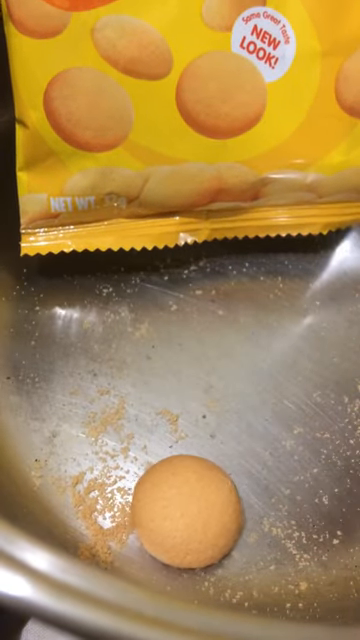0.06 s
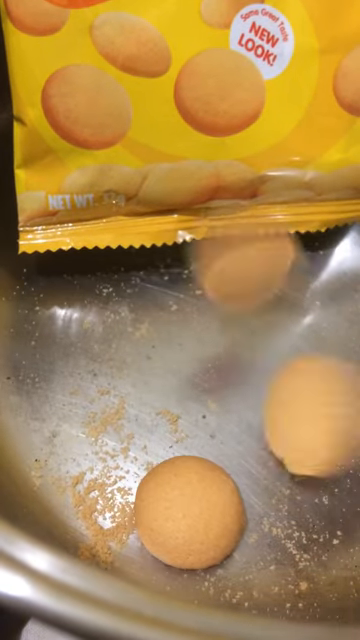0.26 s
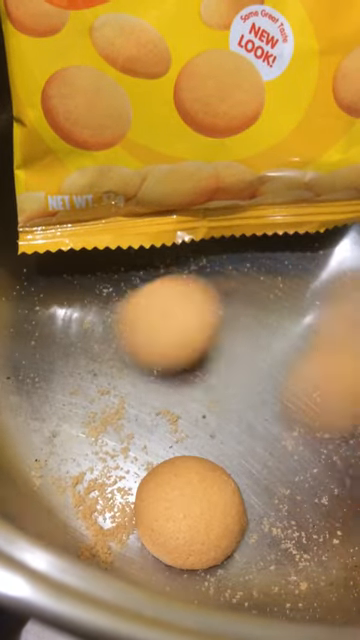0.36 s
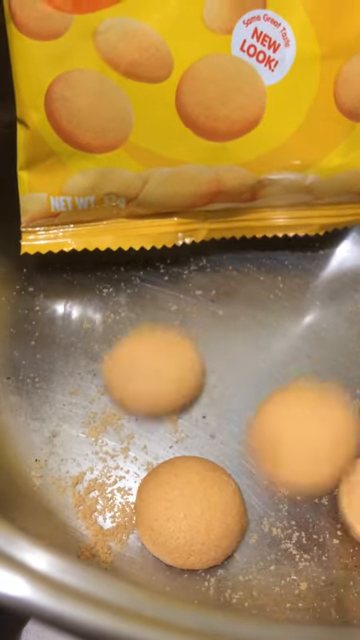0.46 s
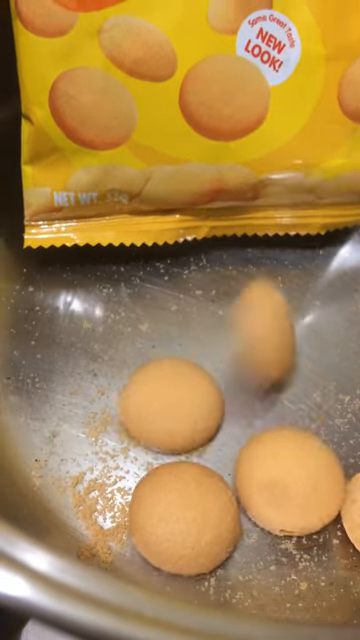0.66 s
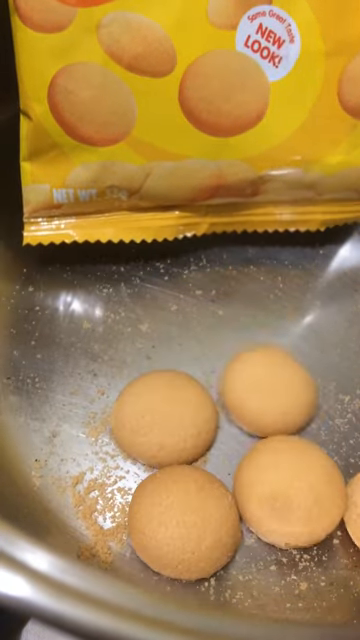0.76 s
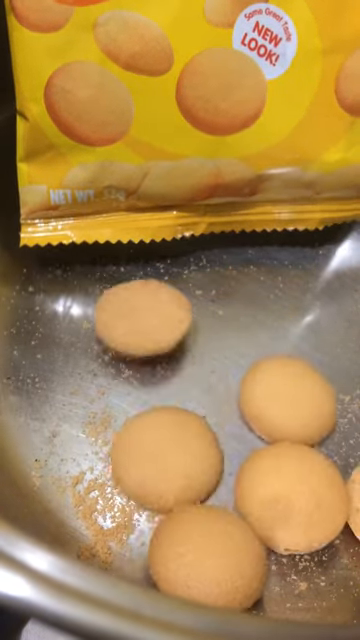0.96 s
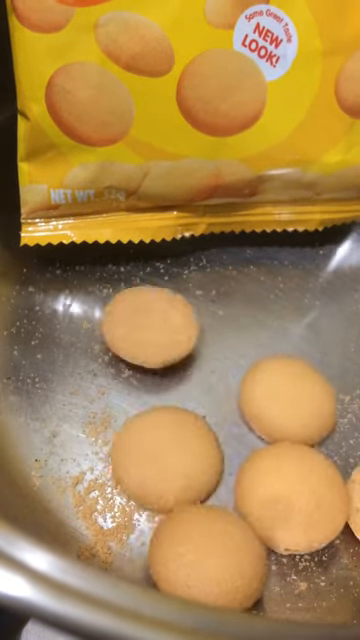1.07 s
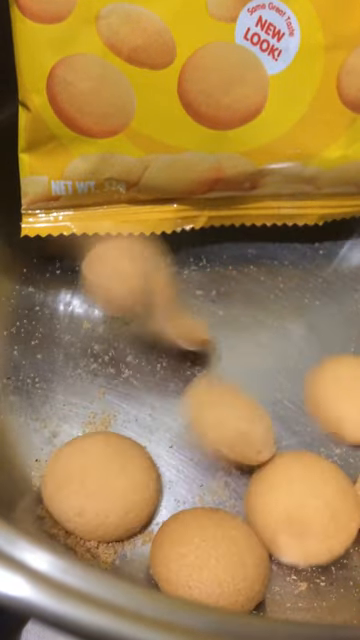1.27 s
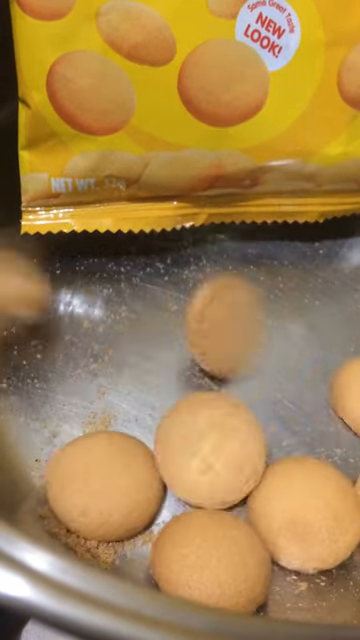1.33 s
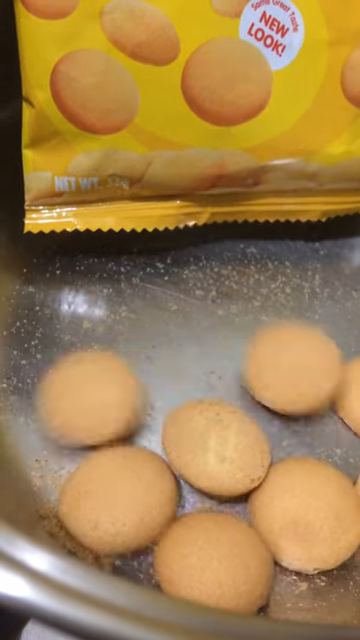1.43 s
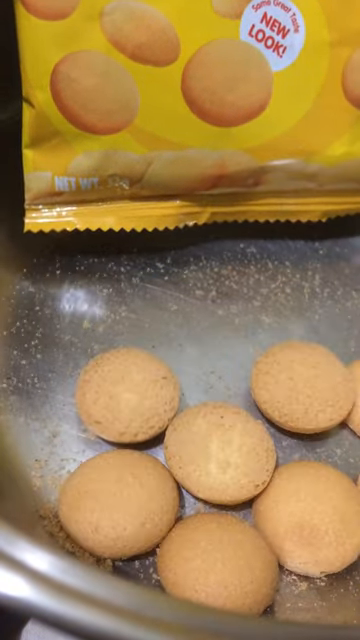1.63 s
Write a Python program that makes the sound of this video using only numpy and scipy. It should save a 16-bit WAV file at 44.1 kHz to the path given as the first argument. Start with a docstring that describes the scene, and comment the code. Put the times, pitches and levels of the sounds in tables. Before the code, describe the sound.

Small hard cookies drop into a steel pan in three quick clusters, each landing with a dry crack and a short metallic ring, then bouncing and knocking together. Heard close in a kitchen, over faint hiss.

```python
"""Small hard cookies drop from a bag into a steel pan, heard from close by in a kitchen.
Each lands with a dry crack, sets the pan's floor and wall ringing, then bounces and knocks against
the others. Cracks are sprays of tiny fractures in the crust; the steel rings in decaying modes.
The bag rustles faintly, crumbs tick, and hiss, a low rumble and mains hum lie underneath."""
import sys
import numpy as np
from scipy import signal
from scipy.fft import rfft, irfft
from scipy.io import wavfile

SR = 44100
rng = np.random.default_rng(int(sys.argv[2]) if len(sys.argv) > 2 else 0)


def master_out(mix):
    """Clip the mix to full scale and print it as 16-bit PCM to the path in sys.argv[1]."""
    frames = np.transpose(np.atleast_2d(mix))
    ceiling = np.clip(frames, -1, 1)
    pcm = np.round(ceiling * 32767).astype(np.int16)
    wavfile.write(sys.argv[1], SR, pcm)


N = 74970
TIME_S = np.arange(N) / SR
AGE_S = TIME_S[:int(.4 * SR)]   # time since a blow


def from_db(db):
    """Decibels to gain."""
    return 10 ** (np.asarray(db) / 20)


def rms_one(x):
    """Scale to unit power."""
    return x / np.sqrt(np.mean(x ** 2) + 1e-20)


def band(x, low_hz, high_hz):
    """Causal band-pass."""
    return signal.sosfilt(signal.butter(2, [low_hz, high_hz], "band", fs=SR, output="sos"), x)


def fade(t60_s):
    """Exponential decay."""
    return np.exp(-np.log(1000) * AGE_S / t60_s)


def add(out, start_s, sound):
    """Mix a sound in at a time."""
    i = int(start_s * SR)
    out[i:i + len(sound)] += sound[:N - i]


def mode(hz, db, t60_s):
    """One decaying sine."""
    return np.sqrt(2) * from_db(db) * fade(t60_s) * np.sin(2 * np.pi * hz * AGE_S)


def struck_modes(table):
    """Sum of modes, each with a random sign, detuning, strength and damping."""
    out = 0
    for hz, db, t60_s in table:
        sign = rng.choice([-1, 1])
        detuned_hz = hz * (1 + .002 * rng.normal())
        out += sign * mode(detuned_hz, db + 3 * rng.normal(), t60_s * np.exp(.2 * rng.normal()))
    return out


def crunch(low_hz, high_hz, t60_s):
    """Crust crushes in a dying spray of tiny fractures: a first snap, then grains on fine dust."""
    fractures_per_s, dust_db, snap_db, snap_t60_s = 3000, -12.5, -4, .013
    grains = (rng.random(len(AGE_S)) < fractures_per_s / SR) * rng.standard_normal(len(AGE_S))
    spray = rms_one(grains) + from_db(dust_db) * rng.standard_normal(len(AGE_S))
    envelope = fade(t60_s) + from_db(snap_db) * fade(snap_t60_s) + 1e-12
    burst = band(spray * envelope, low_hz, high_hz)
    return rms_one(burst) * np.sqrt(np.mean(fade(t60_s) ** 2))


def room_hiss():
    """Coloured noise, rolled off below 155 Hz, drifting slightly in level."""
    # Each row: frequency in Hz, relative density in dB before the roll-off.
    spectrum = [(120, -42), (200, -27.5), (289, -12.5), (806, -19), (916, -19), (1210, -13.5),
                (3490, -33.5), (4120, -33.5), (9060, -43.5), (16000, -42)]
    # Each row: time in seconds, level in dB.
    levels = [(0, -47.5), (.2, -47), (.6, -49), (1.15, -50), (1.69, -46)]
    knots_hz, knots_db = np.transpose(spectrum)
    hz = np.maximum(np.fft.rfftfreq(N, 1 / SR), 1)
    colour = from_db(np.interp(np.log(hz), np.log(knots_hz), knots_db)) * hz / np.hypot(hz, 155)
    hiss = rms_one(irfft(rfft(rng.standard_normal(N)) * colour, N))
    return hiss * from_db(np.interp(TIME_S, *np.transpose(levels)))


def rumble():
    """Low noise that comes and goes."""
    # Each row: time in seconds, level in dB.
    levels = [(0, -44.5), (.1, -45), (.21, -41.5), (.26, -57.5), (.6, -52), (.7, -48), (.8, -55),
              (.95, -56), (1.02, -48.5), (1.1, -57), (1.23, -41.5), (1.32, -44.5), (1.45, -56.5),
              (1.69, -43)]
    noise = rms_one(band(rng.standard_normal(N), 54, 182))
    return noise * from_db(np.interp(TIME_S, *np.transpose(levels)))


def mains_hum():
    """Three steady harmonics of the mains."""
    # Each row: frequency in Hz, level in dB.
    harmonics = [(59, -60), (118, -61.5), (177, -58.5)]
    return sum(np.sqrt(2) * from_db(db) * np.sin(2 * np.pi * (hz * TIME_S + rng.random()))
               for hz, db in harmonics)


def kitchen_reverb(x):
    """Short diffuse tail in two bands."""
    level_db, onset_s = -21, .011
    white = rng.standard_normal(len(AGE_S))
    tail = band(white, 140, 4700) * fade(.29) + band(white[::-1], 7200, 9100) * fade(.3)
    tail *= 1 - np.exp(-(AGE_S / onset_s) ** 2)
    return from_db(level_db) * signal.fftconvolve(x, tail / np.linalg.norm(tail))[:N]


def bag_rustle():
    """The foil bag crinkles faintly while the first cookies slide out."""
    start_s, end_s, ramp_s, creases_per_s = .02, .68, .03, 520
    creases = (rng.random(N) < creases_per_s / SR) * rng.laplace(size=N)
    sliding = np.clip(np.minimum(TIME_S - start_s, end_s - TIME_S) / ramp_s, 0, 1)
    return from_db(-62.5) * sliding * rms_one(band(creases + 1e-18, 1200, 12500))


def crumb_ticks():
    """Crumbs and cookies touch drily, leaving the pan still."""
    # Each row: start in seconds, relative level in dB, band centre in Hz.
    ticks = [(0.167, -69, 4660), (.193, -49, 3520), (0.196, -53, 12000), (0.222, -43, 8000),
             (0.232, -39, 7000), (0.357, -23.5, 8900), (0.506, -43, 8000), (0.566, -43.5, 11000),
             (0.678, -45.5, 9000), (.79, -38.5, 9000), (.825, -46.5, 8900), (1.071, -42.5, 6500),
             (1.314, -40, 11000), (1.503, -41, 5000), (1.562, -44, 8000)]
    edge_ratio = 2 ** .7
    out = np.zeros(N)
    for start_s, db, hz in ticks:
        add(out, start_s, from_db(db + 1) * crunch(hz / edge_ratio, hz * edge_ratio, t60_s=.023))
    return out


def pan_shoves():
    """Heavy contacts shove the whole pan with a short low bump."""
    # Each row: start in seconds, level in dB.
    shoves = [(0.284, -36), (.357, -36), (0.44, -40), (.688, -32.5), (.8835, -33.5), (1.24, -28.5),
              (1.289, -27), (1.3852, -37)]
    out = np.zeros(N)
    for start_s, db in shoves:
        add(out, start_s, from_db(db) * crunch(240, 605, t60_s=.019))
    return out


def mode_gaps(x):
    """Notch the gaps between the pan's clusters of modes."""
    # Each row: centre in Hz, width in Hz.
    gaps = [(5130, 265), (6480, 100)]
    for hz, width_hz in gaps:
        x = signal.lfilter(*signal.iirnotch(hz, hz / width_hz, fs=SR), x)
    return x


def pan_floor(levels_db, t60_s, first_hz, rise_s):
    """Four drum-like modes, damped, detuned and roughened by loose cookies, with a weak longer ring."""
    # Modes 2-4. Each row: frequency in Hz, t60 as a share of the first mode's.
    overtones = [(1537, .62), (2618, .42), (2976, .85)]
    # Each row: frequency in Hz, level in dB relative to its mode, t60 as a multiple of t60_s.
    afterrings = [(796, -25.5, 1.6), (1540, -33, 1.7), (2607, -14, 2.1), (3120, -26, 1.3)]
    sharp_hz, settle_s = 1.4, .0027   # the floor starts sharp and settles
    lead_s = sharp_hz / first_hz * settle_s * (1 - np.exp(-AGE_S / settle_s))
    tuned = [(first_hz, 1)] + [(hz * (1 + .006 * rng.normal()), share) for hz, share in overtones]
    out = 0
    for k, (db, (hz, share)) in enumerate(zip(levels_db, tuned)):
        after_hz, after_db, after_ratio = afterrings[k]
        ring = np.sqrt(2) * from_db(db) * fade(t60_s * share) * np.sin(2 * np.pi * hz * (AGE_S + lead_s))
        ring += mode(after_hz, db + after_db, after_ratio * t60_s)
        chatter = 1 + .063 * rms_one(band(rng.standard_normal(len(AGE_S)), 40, 350))
        out += (-1) ** k * chatter * ring
    radiation = signal.butter(4, 630, "high", fs=SR, output="sos")   # the pan radiates little bass
    return signal.sosfilt(radiation, out * (1 - np.exp(-AGE_S / rise_s)))


def crust_contact(floor_db, wall_db, knock_db, crack_db, fizz_db):
    """A dull thud, then three bands of crunch, each with a shimmer of dense high pan modes."""
    # Knock, crack, fizz. Each row: low and high edge in Hz, burst gain in dB, burst t60 in seconds,
    # shimmer gain in dB, shimmer t60 in seconds.
    bands = [(2170, 5300, 6, 0.017, -15, 0.14), (5450, 8720, 1.5, 0.034, -11, 0.09),
             (9140, 14000, -0.5, 0.042, -8.5, 0.11)]
    out = from_db((floor_db + knock_db) / 2 - 2.5) * crunch(830, 1570, t60_s=.023)
    for db, row in zip((knock_db, crack_db, fizz_db), bands):
        low_hz, high_hz, burst_db, burst_t60_s, shimmer_db, shimmer_t60_s = row
        shimmer = rms_one(band(rng.standard_normal(len(AGE_S)), low_hz, high_hz)) * fade(shimmer_t60_s)
        coupling_db = .25 * (wall_db + 10 - db)   # less wall ring, less shimmer
        out += from_db(db + burst_db) * crunch(low_hz, high_hz, burst_t60_s)
        out += from_db(db + shimmer_db + coupling_db) * shimmer
    return out


def cookie_landings():
    """Each blow cracks the crust and rings the cookie and the pan's floor, wall and bright modes."""
    # Each row: start in seconds; relative levels in dB of floor modes 1-4, wall, knock, crack and fizz;
    # floor t60 in seconds; first floor mode in Hz; the cookie's own clink in Hz.
    blows = [ (0.2433, -13.5, -23.5, -20.5, -22.5, -20.5, -22.5, -14.5, -13, 0.27, 782, 9900),
             (.2860, -11.5, -4, -16, -28, -31, -20, -19.5, -20.5, 0.086, 791, 7100),
             (.3725, -12.5, -22, -23, -28, -37, -21.5, -28, -27, 0.093, 775, 5900),
             (.4025, -16, -42, -17, -52, -33, -43, -22, -23, 0.09, 776.4, 5500),
             (.4065, -19.5, -12, -13.5, -22.5, -29, -16.5, -20, -21.5, 0.074, 787, 6000),
             (0.439, -45, -24, -56, -32, -57, -40, -37, -32.5, 0.043, 800, 9900),
             (.4850, -28.5, -34.5, -49, -54, -52, -60, -73, -56, 0.17, 786, 4200),
             (.5310, -37.5, -33, -64, -65, -58, -49, -55, -44, 0.059, 774, 9500),
             (.6882, -6.5, -16.5, -26, -22, -38.5, -23.5, -25.5, -16, 0.12, 785, 7825),
             (.7345, -16.5, -16, -34, -34, -59, -40, -50, -54, 0.037, 781, 8000),
             (.7665, -32.5, -18, -28.5, -48, -47.5, -36, -44, -48, 0.022, 713, 4250),
             (0.7809, -32, -25.5, -37, -38, -52, -42.5, -60, -41, 0.071, 827, 4200),
             (.8835, -6, -4.5, -53.5, -46, -52, -18, -16, -20.5, 0.072, 788, 5965),
             (.9215, -17.5, -27, -25.5, -55, -57, -33, -30, -29, 0.069, 794, 8000),
             (.9440, -25, -49, -37, -35, -52.5, -35, -66, -45, 0.097, 774, 6000),
             (1.026, -26.5, -40, -35, -49, -61, -48.5, -75, -56, 0.053, 800, 6000),
             (1.2400, -15.5, -9, -16.5, -26, -27, -20, -23.5, -16, 0.065, 833, 12600),
             (1.2498, -27.5, -12.5, -16, -38, -54, -13.5, -23, -46, 0.088, 805, 6700),
             (1.2783, -30.5, -16.5, -41, -42, -48, -57, -51, -71, 0.066, 730, 5900),
             (1.2891, -10, -13.5, -27, -23, -38.5, -22, -34, -25, 0.073, 781.5, 12000),
             (1.3300, -44, -17, -27, -39.5, -64, -29.5, -38, -41, 0.042, 744, 6000),
             (1.3864, -18.5, -34, -19.5, -22, -32.5, -30.5, -12, -14, 0.023, 666, 8070),
             (1.398, -18, -25, -29.5, -28, -38.5, -45, -26, -47, 0.053, 749, 8600),
             (1.4058, -21.5, -26, -44.5, -30, -57, -27.5, -29, -31, 0.045, 745, 4200),
             (1.4630, -28.5, -32, -84, -65, -74, -55, -60, -62, 0.09, 800, 8000),
             (1.4836, -26.5, -18, -26, -57, -52, -29.5, -34, -32.5, 0.065, 790, 12800),
             (1.5130, -33.5, -30, -68.5, -67.5, -50, -38, -42.5, -38, 0.077, 803, 4200)]
    # Each row of both: frequency in Hz, relative level in dB, t60 in seconds.
    wall_modes = [(1832, -16, .2), (3560, -23, .2), (3950, -12, .1), (4034, -11, .2), (4110, -11, .13),
                  (4196, -15, .25), (4258, -15, .42), (4303, -9, .17), (4431, -10, .14), (4579, -14, .14),
                  (4699, -13, .28), (4765, -17, .18)]
    bright_modes = [(5475, -19, .1), (5970, -15, .04), (6643, -18, .08), (7160, -19, .08), (7825, -14, .06),
                    (8170, -15, .09), (8480, -13, .09), (8685, -19, .12), (9930, -14, .06),
                    (10400, -14, .055)]
    rings, contacts = np.zeros((2, N))
    for start_s, *floor_db, wall_db, knock_db, crack_db, fizz_db, t60_s, floor_hz, clink_hz in blows:
        rise_s = .0013 * from_db(-.11 * (crack_db + 17))   # weaker blows start the floor more slowly
        ring = pan_floor(floor_db, t60_s, floor_hz, rise_s)
        ring += from_db(wall_db + 2.5) * struck_modes(wall_modes)
        ring += from_db(crack_db - 8.5) * struck_modes(bright_modes)
        ring += mode(clink_hz, crack_db + 5, t60_s=.019)
        add(rings, start_s, ring)
        add(contacts, start_s, crust_contact(floor_db[0], wall_db, knock_db, crack_db, fizz_db))
    return rings + mode_gaps(contacts)


def scene():
    """Cookies, pan and bag in the kitchen; mono."""
    close = cookie_landings() + pan_shoves() + crumb_ticks() + bag_rustle()
    return (close + kitchen_reverb(close) + room_hiss() + rumble() + mains_hum())[None]


def record(dry):
    """The microphone softens the highest treble; peaks are rounded and the top is cut."""
    mic_top_hz, cutoff_hz = 14800, 17200
    soft = signal.sosfilt(signal.butter(6, mic_top_hz, fs=SR, output="sos"), dry)
    rounded = soft / (1 + soft ** 6) ** (1 / 6)
    return signal.sosfilt(signal.cheby2(12, 70, cutoff_hz, fs=SR, output="sos"), rounded)


dry = scene()
out = record(dry)
master_out(out)
```